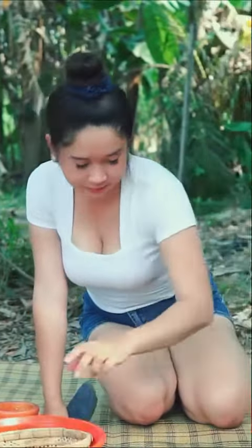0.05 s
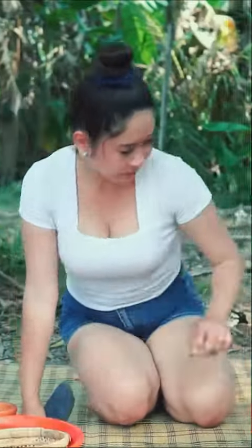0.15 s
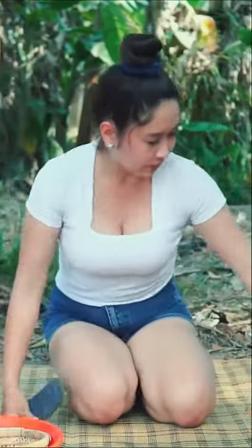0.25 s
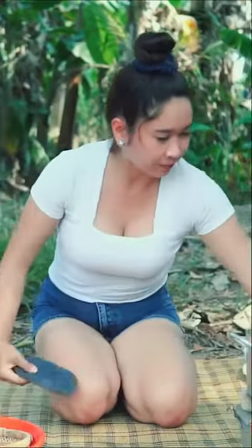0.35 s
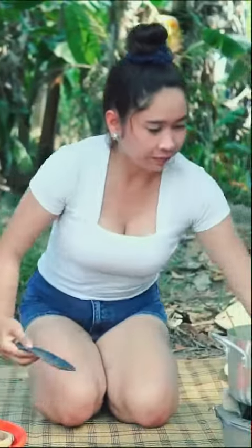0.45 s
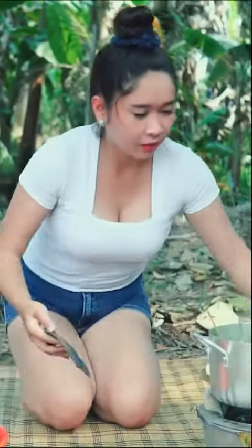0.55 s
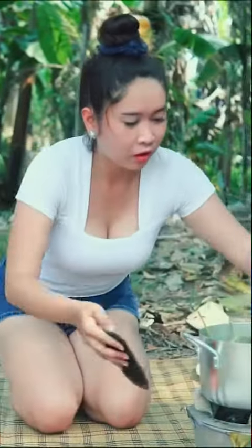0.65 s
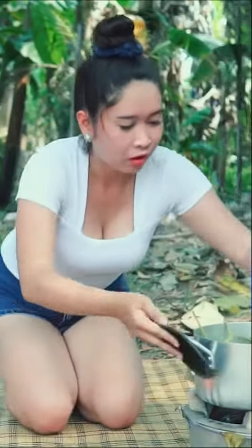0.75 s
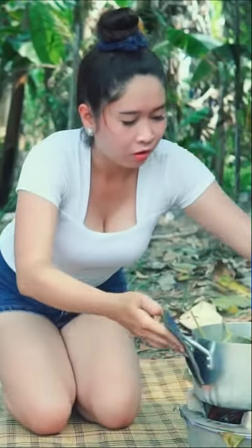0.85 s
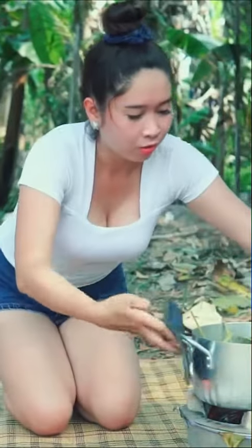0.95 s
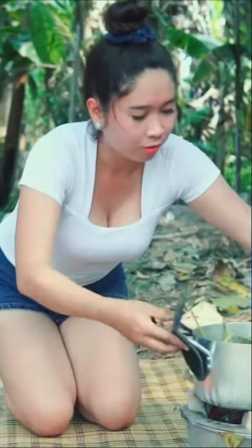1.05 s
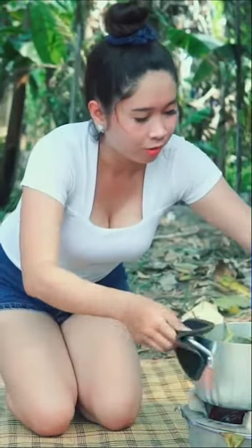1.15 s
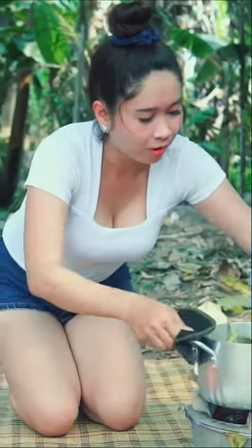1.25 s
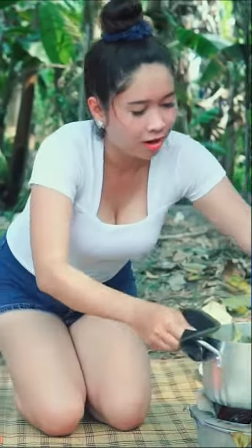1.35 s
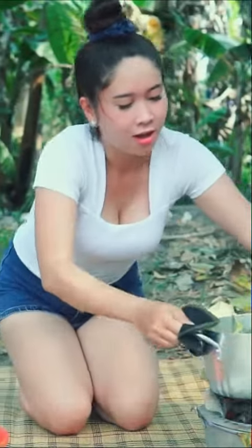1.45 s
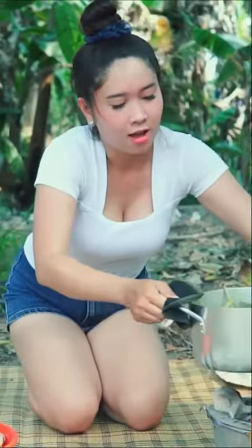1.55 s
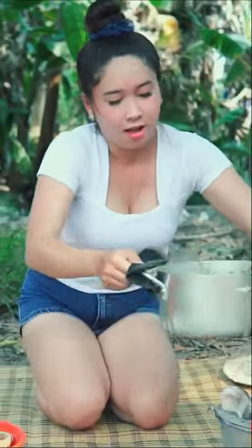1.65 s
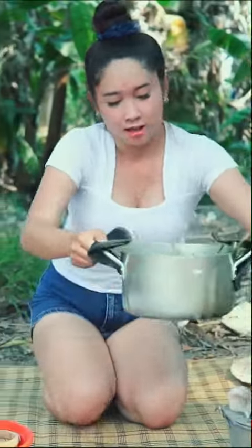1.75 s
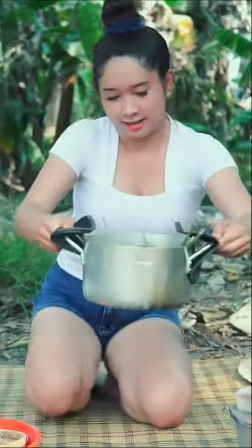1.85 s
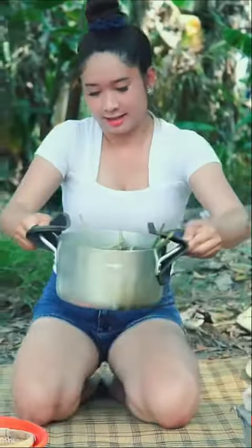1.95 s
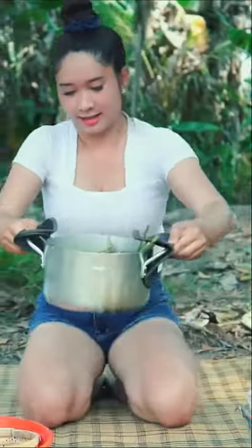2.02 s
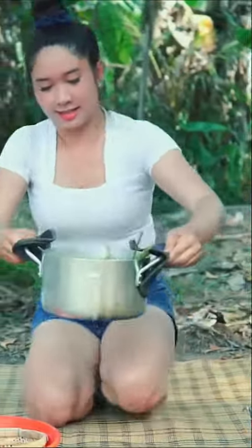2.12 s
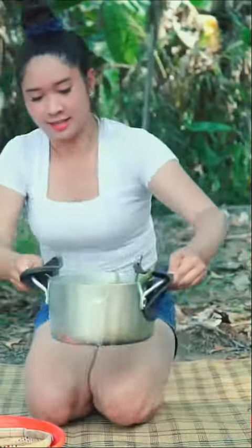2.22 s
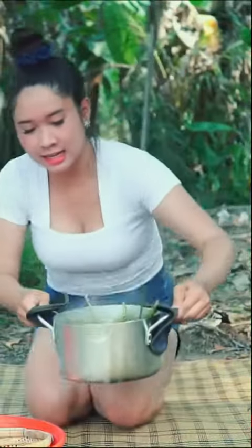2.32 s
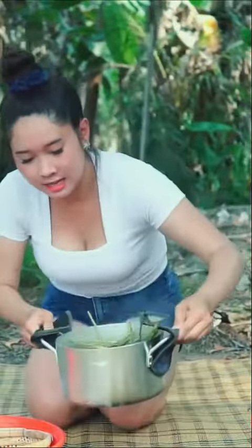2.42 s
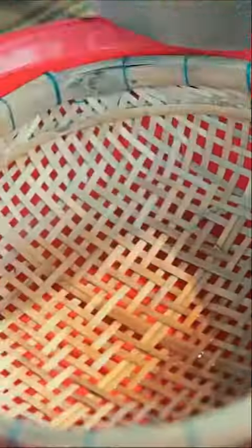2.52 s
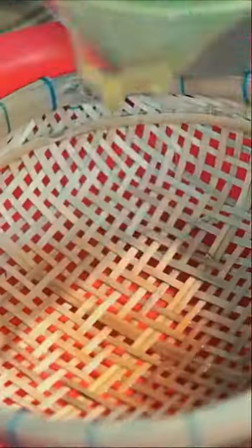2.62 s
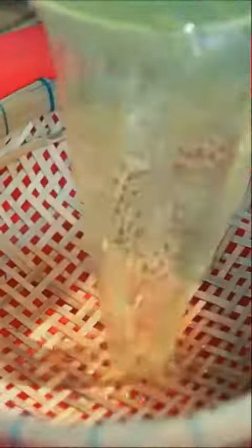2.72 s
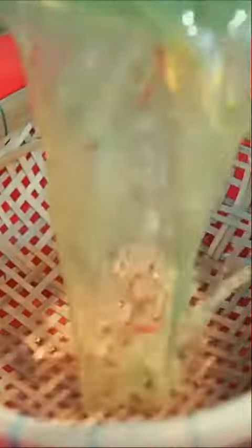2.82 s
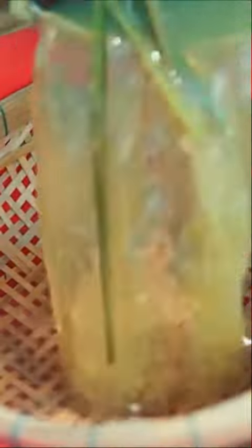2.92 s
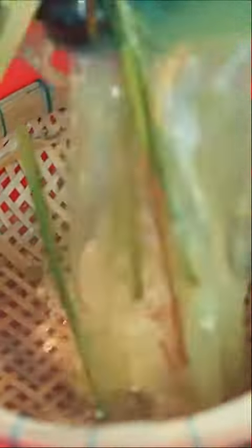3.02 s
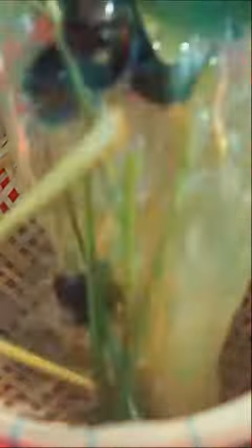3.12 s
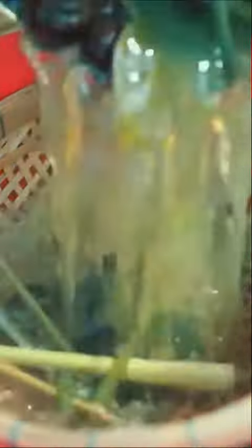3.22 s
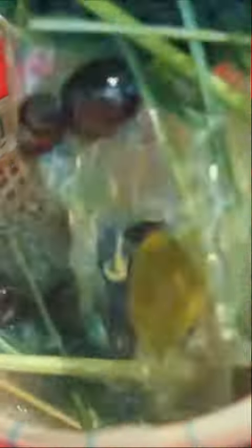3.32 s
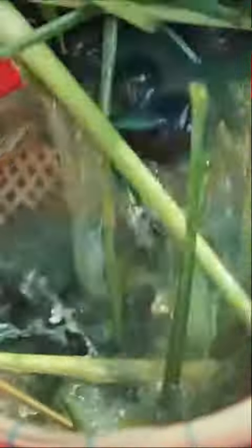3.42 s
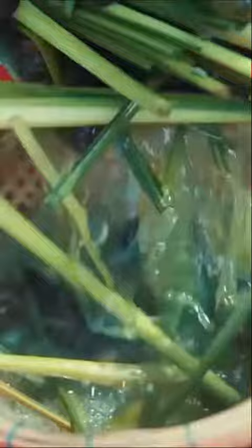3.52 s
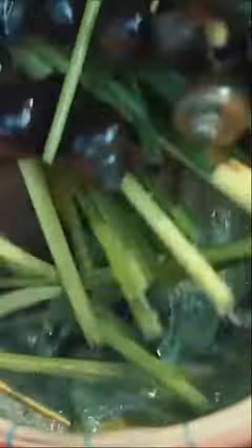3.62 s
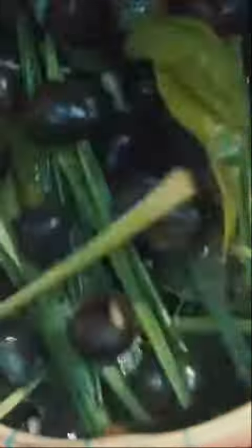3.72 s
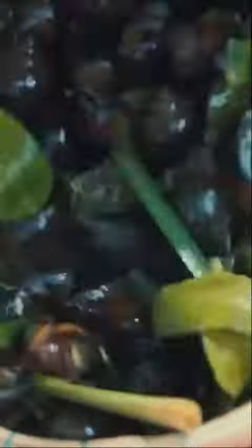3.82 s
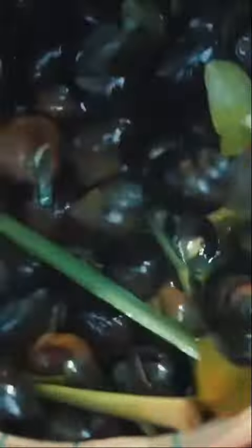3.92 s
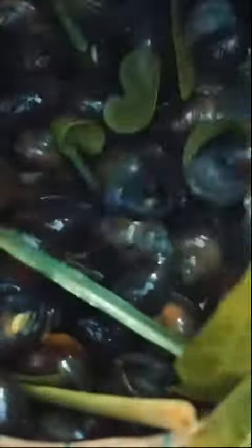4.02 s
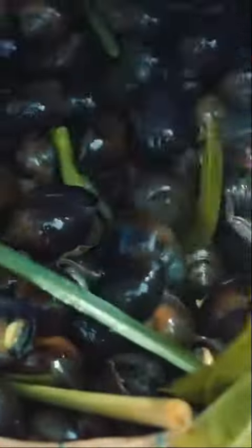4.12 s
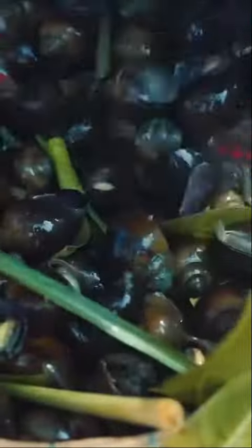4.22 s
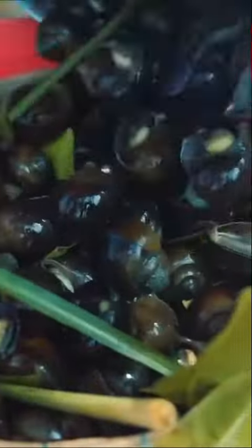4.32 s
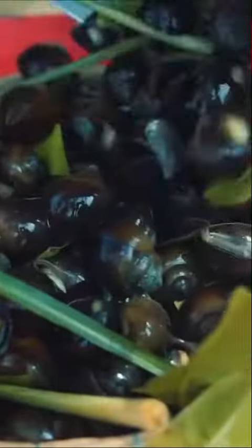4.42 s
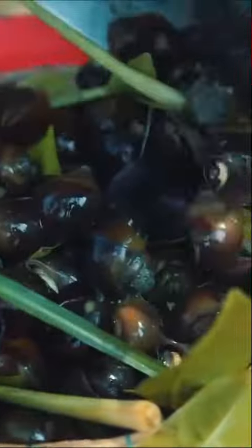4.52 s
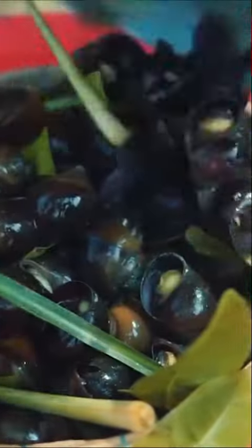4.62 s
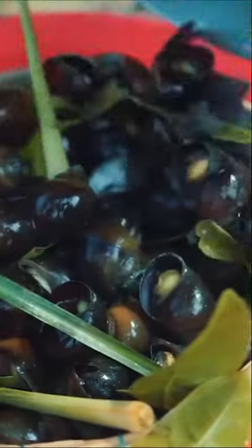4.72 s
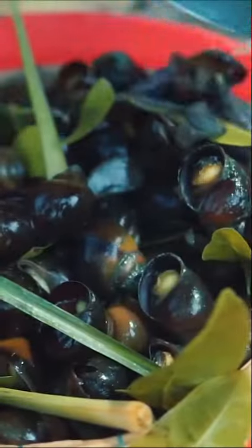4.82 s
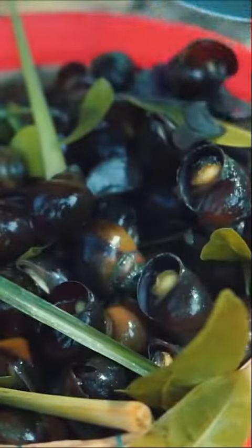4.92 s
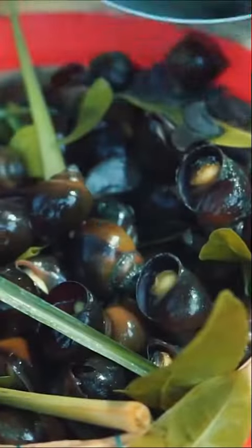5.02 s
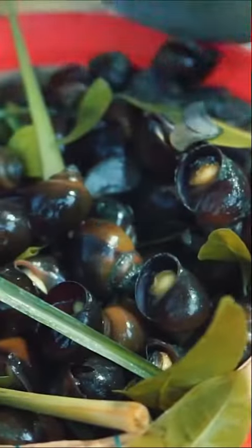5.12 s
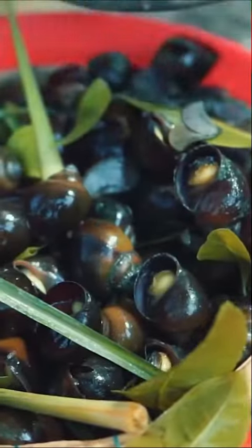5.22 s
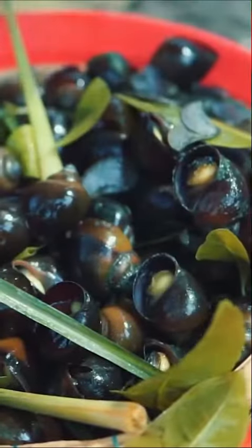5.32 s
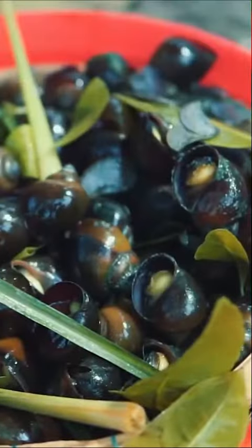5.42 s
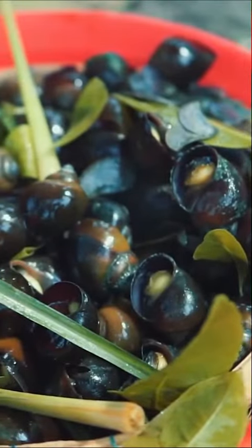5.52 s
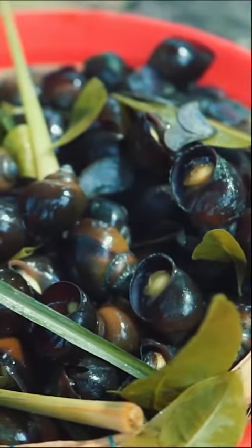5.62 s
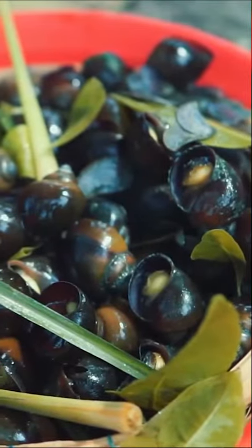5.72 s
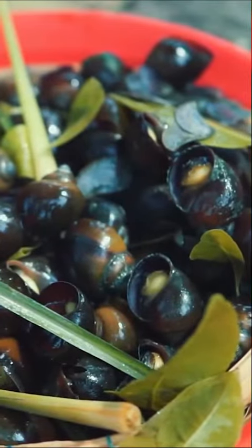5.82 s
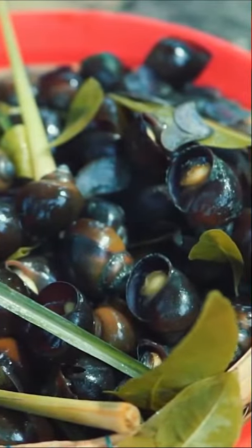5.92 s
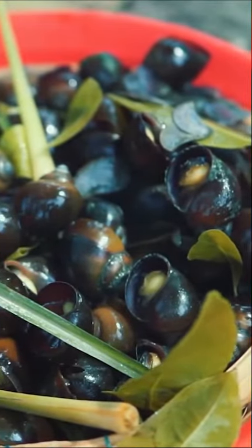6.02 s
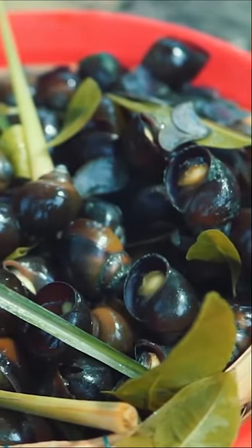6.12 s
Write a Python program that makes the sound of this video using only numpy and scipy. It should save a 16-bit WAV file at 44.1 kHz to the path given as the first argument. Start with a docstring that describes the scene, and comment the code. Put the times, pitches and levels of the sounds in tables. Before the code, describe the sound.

Boiled snails and broth tip from a pot into a woven basket, hard shells clattering wetly, then the empty pot clanks down among faint birdsong.

```python
"""A garden with trees: a pot of boiled snails is tipped into a woven basket close by.
Soft bumps lift the pot; broth splutters through the weave as filtered noise, and shells follow as chance
contacts, short pitched rings, steady narrow resonances, clacks and crunching clumps. The empty pot is set
down as a bank of struck modes. Small birds peep and whistle as gliding tones over noisy garden air.
"""
import sys
import numpy as np
from scipy import signal
from scipy.io import wavfile

SR = 44100
rng = np.random.default_rng(int(sys.argv[2]) if len(sys.argv) > 2 else 0)


def store_pcm(level_fs):
    """Save levels as 16-bit WAV."""
    pcm = np.round(np.clip(level_fs, -1, 1) * 32767).astype(np.int16)
    wavfile.write(sys.argv[1], SR, np.atleast_2d(pcm).T)


N = 271656
TIME = np.arange(N) / SR
SIDES = np.array([[1], [-1]])   # left, right

# band-pass filters across the audible range: (centre [Hz], width [Hz], filter)
EDGES = np.geomspace(22, 17000, 27)
BANK = [(np.sqrt(low * high), high - low, signal.butter(2, [low, high], "band", fs=SR, output="sos"))
        for low, high in zip(EDGES, EDGES[1:])]


def from_db(db):
    """Amplitude for a level in dB."""
    return 10 ** (np.asarray(db) / 20)


def rms_one(x):
    """Scale to an rms of 1."""
    return x / np.sqrt(np.mean(x ** 2) + 1e-20)


def at_hz(points, hz):
    """Read a table at one frequency, on a logarithmic axis."""
    table = np.array(points)
    return np.interp(np.log(hz), np.log(table[:, 0]), table[:, 1])


def in_time(rows):
    """Level curves in dB, at -120 dB outside their span."""
    s, *columns = np.transpose(rows)
    return [np.interp(TIME, s, c, left=-120, right=-120) for c in columns]


def filt(x, hz, kind, order=2):
    """Butterworth filter."""
    return signal.sosfilt(signal.butter(order, hz, kind, fs=SR, output="sos"), x + 1e-18)


def pan(db):
    """Left and right gains for a level difference."""
    gains = from_db(db * SIDES / 2)
    return gains / gains.mean()


def stereo(pair, alike):
    """Two unrelated signals become a left and right of the given likeness."""
    alike = np.clip(alike, -.99, .99)
    return np.sqrt(1 + alike) * pair[0] + np.sqrt(1 - alike) * pair[1] * SIDES


def add(out, s, sound):
    """Mix a sound in from time s."""
    start = int(np.clip(round(s * SR), 0, N - 1))
    out[..., start:start + sound.shape[-1]] += sound[..., :N - start]


def drift(rate, size=N):
    """A random wander through normal values, rate of them per second, joined by straight lines."""
    return np.interp(TIME[:size] * rate, np.arange(4096), rng.standard_normal(4096))


def swell(s, attack_s, hold_s, release_s):
    """An envelope that grows until time s, holds and dies away."""
    growth = np.minimum(TIME - s, 0) / attack_s
    decay = np.maximum(TIME - s - hold_s, 0) / release_s
    return np.exp(growth - decay)


def resonance(x, hz, width_hz):
    """A two-pole resonance with gain 1 on top."""
    r = np.exp(-np.pi * width_hz / SR)
    feed = np.array([1, 0, -1]) * (1 - r * r) / 2
    return signal.lfilter(feed, [1, -2 * r * np.cos(2 * np.pi * hz / SR), r * r], x + 1e-18)


def tone_at(hz_curve):
    """A sine that follows a pitch curve."""
    return np.sin(2 * np.pi * np.cumsum(hz_curve) / SR)


def echoes(x, t60, wet_db, size=26000):
    """Scattered reflections that die away, different on each side."""
    tail = rng.standard_normal((2, size)) * from_db(-60 * TIME[:size] / t60)
    tail /= np.sqrt(np.sum(tail ** 2, axis=1, keepdims=True))
    return x + from_db(wet_db) * signal.fftconvolve(np.atleast_2d(x), tail, axes=1)[:, :N]


# centres of body, clatter and splash [Hz]
ZONES_HZ = [1090, 3740, 10300]


def zone_level(zone_db, hz):
    """Level at one frequency, between those of body, clatter and splash."""
    shares = [np.interp(np.log(hz), np.log(ZONES_HZ), row) for row in np.eye(3)]
    return np.dot(shares, zone_db)


# flow out of the pot: (time [s], level [dB])
POUR_FLOW = [(2.6, -65), (2.741, -59.5), (2.82, -55), (3.01, -45), (3.14, -41), (3.33, -41.5), (3.46, -37),
             (3.599, -36.5), (3.68, -34), (3.77, -31.5), (3.86, -28), (4.0, -31), (4.11, -31.5),
             (4.15, -33), (4.225, -35.5), (4.27, -31.5), (4.298, -42), (4.335, -30), (4.45, -30.5),
             (4.56, -40), (4.595, -46), (4.68, -47), (4.77, -51), (5.05, -82)]
POUR_START_S, POUR_END_S = POUR_FLOW[0][0], POUR_FLOW[-1][0]
# the growing heap muffles the basket, and shell meets shell
HALF_FULL_S, HEAP_DAMPS_DB_PER_S, HEAP_BRIGHTENS_DB_PER_S = 3.67, 5, 6


def pour_levels(body_swing=0.97):
    """Body, clatter and splash in dB: all follow the flow, and the heap shifts the colour upward."""
    flow, heap = in_time(POUR_FLOW)[0], TIME - HALF_FULL_S
    body = flow.max() + body_swing * (flow - flow.max())
    return np.array([body - HEAP_DAMPS_DB_PER_S * heap, flow, flow + HEAP_BRIGHTENS_DB_PER_S * heap])


# colour of the shells: (frequency [Hz], density [dB per Hz])
SHELL_COLOUR = [(150, -15), (300, -17.5), (480, -10.5), (700, -9.5), (880, -10.5), (1280, 1), (1900, -1.5),
                (2400, 0), (3900, 1), (6100, -2), (6900, -5.5), (10400, -2.5), (14000, -10), (16000, -13.5)]
# likeness of the two sides, close by: (frequency [Hz], left-right likeness [-1 to 1])
NEAR_LIKENESS = [(300, 0.89), (1200, -0.2), (2400, 0.66), (5000, 0.5), (8000, 0.19), (13000, 0.2)]
# lean to the left, close by: (frequency [Hz], left-right difference [dB])
NEAR_PAN = [(400, 1), (1300, 3), (2400, 0.5), (4400, 5), (8100, 8.5), (15000, 11)]


def shell_sound(contacts, zone_db, patchy_db, lowest_hz=200):
    """Contacts excite every band with chance strengths; the colour shifts as the shells turn."""
    out, power, size = 0, 0, len(contacts)
    for hz, width, sos in BANK:
        if hz > lowest_hz:
            kicks = stereo(contacts * rng.standard_normal((2, size)), at_hz(NEAR_LIKENESS, hz))
            gain = from_db(at_hz(SHELL_COLOUR, hz))
            level = from_db(zone_level(zone_db, hz) + patchy_db * drift(59.6, size))
            band = signal.sosfilt(sos, kicks + 1e-18)
            out = out + gain * level * pan(at_hz(NEAR_PAN, hz)) * band
            power += gain ** 2 * width / (SR / 2)
    return out / np.sqrt(power)


def pour(contacts_per_s=800, size_db=2.0, wash=1.0, clatter_db=-0.5, splash_db=-0.5):
    """Countless small wet contacts over the wash of the broth."""
    during = (TIME > POUR_START_S) & (TIME < POUR_END_S)
    body, clatter, splash = pour_levels()[:, during]
    sizes = from_db(size_db * np.minimum(rng.exponential(1, N), 3.5))
    hits = rms_one(sizes * (rng.random(N) < contacts_per_s / SR))
    contacts = rms_one(hits + wash)
    out = np.zeros((2, N))
    zones = [body, clatter + clatter_db, splash + splash_db]
    add(out, POUR_START_S, shell_sound(contacts[during], zones, patchy_db=3.0))
    return out


def ring_growth(s, rise_db_per_s=10.0):
    """Level of the ringing in dB, growing until HALF_FULL_S, then constant."""
    return rise_db_per_s * np.minimum(s - HALF_FULL_S, 0)


def hollow_shells(t60=0.097, size_db=2.5, body_db=1.0, clatter_db=-1.5, splash_db=3.5,
                  lowest_hz=620, highest_hz=14000, count=750, size=4000):
    """Jostled shells and the bubbles between them ring briefly, each at its own pitch and place."""
    levels = pour_levels().T + [body_db, clatter_db, splash_db]
    out, t = np.zeros((2, N)), TIME[:size]
    chances = zip(rng.random((count, 2)), rng.standard_normal((count, 3)))
    for (when, pitch), (strength, place, skew) in chances:
        s = POUR_START_S + when * (POUR_END_S - POUR_START_S)
        hz = lowest_hz * (highest_hz / lowest_hz) ** (pitch ** .75)
        db = zone_level(levels[int(s * SR)], hz) + at_hz(SHELL_COLOUR, hz)
        db += size_db * min(strength, 1.5) + ring_growth(s)
        # high rings die sooner; each takes about a millisecond to start
        fade = from_db(-60 * t / t60 * (hz / 3000) ** .55) * (1 - np.exp(-t / .0008))
        ring = np.sin(2 * np.pi * hz * t + .5 * skew * SIDES)
        add(out, s, from_db(db) * fade * ring * pan(at_hz(NEAR_PAN, hz) + 4 * place))
    return out


def collision(force, hz, body_db, edge_db, ring_gain, ring_q, partner_gain=1.7, partner_octaves=0.895):
    """A burst of contacts rings the struck shell's cavity and its partner's; its power follows the force."""
    burst = shell_sound(force, [body_db, 0, edge_db], patchy_db=-4.5)
    partner_hz = hz * 2 ** (partner_octaves * rng.uniform(-0.923, 1))
    ring = ring_gain * resonance(burst, hz, hz / ring_q)
    partner = partner_gain * resonance(burst, partner_hz, partner_hz / (2 * ring_q))
    burst = burst + ring + partner
    return burst * np.sqrt(np.sum(force ** 2) / np.sum(burst.mean(axis=0) ** 2))


# later hits have less body; larger, lower shells have more
HIT_DAMPS_DB_PER_S, BODY_DB_PER_OCTAVE, TYPICAL_SHELL_HZ = 10.5, 10, 3420


def heap_body(s, hz):
    """Body in dB of a shell of a given pitch landing on the heap."""
    return -HIT_DAMPS_DB_PER_S * (s - HALF_FULL_S) - BODY_DB_PER_OCTAVE * np.log2(hz / TYPICAL_SHELL_HZ)


CRACK_LEAD_S = .005   # the graze heard before the impact


def crack(hz, edge_db, ring_gain=11.3, ring_q=5.4, partner_gain=3.6, snap_db=-2.0, size=2600):
    """The instant of impact: one click and a few cycles of the two shells' cavities."""
    click = np.zeros(size)
    click[round(CRACK_LEAD_S * SR)] = 1
    partner_hz = TYPICAL_SHELL_HZ * 2 ** rng.uniform(-1.46, 0.83)
    ring = ring_gain * resonance(click, hz, hz / ring_q)
    partner = partner_gain * resonance(click, partner_hz, partner_hz / ring_q)
    snap = from_db(edge_db + snap_db) * filt(click, 7400, "high")
    sound = filt(click, [1000, 5500], "band") + ring + partner + snap
    return filt(sound / np.abs(sound).max(), 410, "high")


# single shells colliding, levels relative: (time [s], crack level [dB], ring [Hz], rattle level [dB],
# treble against the rattle [dB], rattle decay [s])
CLACKS = [(2.645, -42, 1960, -35, -13, .0047), (3.0119, -17.5, 2000, -14, -38, 0.0021),
          (3.0261, -30, 1720, -22, -28, 0.0024), (3.1157, -6, 1750, -15.5, -11.5, 0.0038),
          (3.1536, -15, 2540, -23, -28, .0015), (3.2089, -4, 2060, -0.5, -22, 0.0018),
          (3.2574, -10, 2320, -11, -35, 0.0042), (3.2617, -13, 2280, -4.5, -11, 0.0021),
          (3.3384, -18, 4500, -16.5, -16, 0.0044), (3.3728, -1, 4740, -3.5, -21, 0.0038),
          (3.382, -11, 2330, -8.5, -12, 0.0065), (3.3965, -13, 1670, -10.5, -24, 0.0039),
          (3.504, -13, 4950, -19, -25, 0.0046), (3.5183, -7.5, 3670, -5, -14, 0.003),
          (3.5689, -8, 2820, -11, -32, .002), (3.6313, -11, 4470, -9, -26, 0.0033),
          (3.657, -5, 3700, -0.5, -13.5, 0.0016), (3.675, -15, 4950, -17, -26, .0023),
          (3.691, -9, 2600, -10, -27, .0018), (3.707, -2, 3300, -4, -24, 0.0028),
          (3.7298, -8, 3150, -10, -22, .002), (3.758, -3, 5060, -5.5, -16, 0.0034),
          (3.7676, -10.5, 1260, -11, -20, 0.0025), (3.7885, -10, 2480, -6, -23, 0.0025),
          (3.791, -7, 1800, -10, -21, .002), (3.8016, -19, 2440, -11, -16, 0.0038),
          (3.8169, -11, 4170, -2, -21, 0.0031), (3.8775, -14, 3700, -20, -10, .0015),
          (3.9278, -14, 4750, -9, -5, .0017), (3.948, -20, 3550, -18, -20, 0.0023),
          (3.991, -5, 6260, -4.5, -13, 0.004), (4.165, -13, 4400, -13, -16, .003),
          (4.1748, -14, 3930, -4, -21, 0.0027), (4.1882, -13, 2470, -13, -11, .0035),
          (4.2605, -11, 4160, -9.5, -24, .0029), (4.2837, -16, 1550, -16, -11, 0.0017),
          (4.312, -8.5, 2350, -4, -20, 0.003), (4.347, -12, 3900, -12, -4, .0015),
          (4.3742, -14, 3500, -15, -10, .002), (4.3973, -19, 5200, -10, -8, 0.003),
          (4.4337, -17, 4500, -6, -5, 0.0032), (4.492, -6, 4620, -5.5, -1, 0.0051),
          (4.572, -16, 1570, -16, -7, 0.0052), (4.6033, -16.5, 2970, -11.5, -8, 0.0023),
          (4.6506, -21, 2020, -18, -16, 0.0019), (4.6849, -12.5, 4900, -8, -10, 0.0024),
          (4.7326, -12.5, 3300, -5.5, -16, 0.0012), (4.7575, -24, 2800, -18.5, -11, .003),
          (4.7713, -27, 3900, -24, -10, .0025), (4.7963, -26, 5500, -20.5, -8, 0.0043),
          (4.8105, -25, 1500, -23.5, -9.5, 0.0044), (4.849, -22, 2480, -17, -17, 0.0037),
          (4.8784, -26, 3500, -19.5, -17, .0015), (4.9178, -16, 6600, -13.5, -6, 0.0035),
          (5.1335, -19, 5470, -22.5, -4.5, 0.0097)]


def clacks(crack_db=-0.5, rattle_db=-7.5, body_db=-2.0, edge_db=16.5,
           settle_db=-25.0, settle_s=0.032, graze_share=0.77, size=2600):
    """Two shells graze, meet in a sharp crack and rattle; then their neighbours settle."""
    out, t = np.zeros((2, N)), TIME[:size] - CRACK_LEAD_S
    after = np.maximum(t, 0)
    settling = from_db(settle_db) * np.exp(-after / settle_s)
    for s, crack_level, hz, rattle_level, treble, rattle_s in CLACKS:
        graze = np.exp(np.minimum(t, 0) / (graze_share * rattle_s))
        force = .5 * (np.exp(-after / rattle_s) + settling) * graze
        edge = treble + edge_db
        rattle = collision(force, hz, heap_body(s, hz) + body_db, edge, ring_gain=1.3, ring_q=8.9)
        impact = crack(hz, edge) * pan(at_hz(NEAR_PAN, hz) + 1.9)
        clack = from_db(rattle_level + rattle_db) * rattle + from_db(crack_level + crack_db) * impact
        add(out, s - CRACK_LEAD_S, clack)
    return out


# clumps of shells landing, levels relative:
# (time [s], level [dB], ring [Hz], spread [s], body [dB], treble [dB])
CLUMPS = [(3.138, -15, 2060, 0.011, 6.5, -8.5), (3.163, -12, 1890, 0.0022, 12, -13),
          (3.27, -8, 3530, 0.0047, 11, 5), (3.298, -14.5, 1530, 0.0064, 19, -1),
          (3.452, -8.5, 1170, 0.0094, 1, -9), (3.56, -8.5, 1394, 0.005, 9.5, -5.5),
          (3.641, -9.5, 3380, 0.0063, 7.5, -5.5), (3.693, -9, 3450, 0.0029, 15.5, -2),
          (3.717, -6, 3200, 0.0063, 6, 6), (3.791, -4.5, 2500, 0.0048, 3, -3),
          (3.864, -5.5, 3700, 0.025, -28, 4.5), (3.946, -7, 3560, 0.022, 5.5, 4),
          (4.012, -8.5, 5200, 0.029, 2.5, 7.5), (4.195, -11.5, 2130, 0.013, 1, -8),
          (4.25, -9.5, 7500, 0.003, -5, 1), (4.351, -13.5, 4550, 0.012, 1, 1.5),
          (4.491, -9.5, 4496, 0.0055, 1, 5), (4.628, -18, 1820, 0.006, 4.5, 0),
          (4.649, -21.5, 2170, 0.0092, 2, 0)]


def clumps(level_db=-14.0, edge_db=5.5, contact_share=.08, lag_s=0.00026, size=3528):
    """Several shells land almost together in a crunch that swells and fades."""
    out, t = np.zeros((2, N)), TIME[:size] - TIME[size] / 2
    for s, db, hz, spread, body, treble in CLUMPS:
        grains = rms_one(1.0 * (rng.random(size) < contact_share))
        force = grains / np.cosh((t - lag_s) / spread)
        crunch = collision(force, hz, body, treble + edge_db, ring_gain=1.32, ring_q=8.2)
        add(out, s + t[0], from_db(db + level_db) * crunch)
    return out


# steady narrow resonances heard over the pour and clumps: (frequency [Hz], relative gain [dB])
STEADY_TONES = [(610, 5.5), (708, 3.5), (1300, -8), (2220, 1), (2484, -2), (2684, 0), (3530, 5.5),
                (3838, 0), (3990, -2), (4500, 7), (5156, 2.5), (5490, -2.5), (5940, 4), (6335, 4)]


def steady_tones(x, direct_db=-1.5, ring_db=-1.0, width_hz=28, wander_db=3.5, wander_per_s=7):
    """Steady narrow resonances over the pour and clumps; each wanders in level."""
    rings = 0
    for hz, db in STEADY_TONES:
        level = from_db(db + wander_db * drift(wander_per_s))
        rings = rings + level * resonance(x, hz, width_hz)
    return from_db(direct_db) * x + from_db(ring_db + ring_growth(TIME)) * rings


# broth drumming through the bare weave: (time [s], level [dB])
STREAM = [(2.74, -76), (2.79, -54), (2.9, -51.5), (3.0, -42), (3.1, -47.5), (3.25, -55.5)]


def stream(hz=2400, width_hz=560, spray_db=-0.5, splutter_db=0.5, splutter_per_s=130):
    """The first broth splutters through the weave with a hollow gurgle and a fine spray of drops."""
    hollow = resonance(resonance(rng.standard_normal((2, N)), hz, width_hz), hz, width_hz)
    gurgle = hollow * from_db(splutter_db * drift(splutter_per_s))
    gurgle = rms_one(stereo(gurgle, alike=0.95)) * pan(db=2.0)
    drops = rng.standard_normal((2, N)) * (rng.random(N) < 3000 / SR)   # 3000 drops per second
    spray = from_db(spray_db) * rms_one(filt(drops, [4000, 13000], "band", order=1)) * pan(db=12.0)
    return (gurgle + spray) * from_db(in_time(STREAM)[0])


# a shell squeaks along the rim of the pot: (time [s], level [dB], spread [s])
SQUEAKS = [(4.709, -26, 0.0039), (4.744, -32, 0.0058)]
# tones of the squeak: (frequency [Hz], relative level [dB])
SQUEAK_TONES = [(4290, -8), (4730, -3.5), (5500, -11)]


def squeaks(rough=0.0079):
    """A shell slides over the metal rim and squeals on a few unsteady tones."""
    level = sum(from_db(db) * np.exp(-np.hypot(1, (TIME - s) / spread) + 1) for s, db, spread in SQUEAKS)
    tones = sum(from_db(db) * tone_at(hz * (1 + rough * drift(790))) for hz, db in SQUEAK_TONES)
    return level * tones * pan(db=6.0)


def struck(modes, contact_hz, sharpness, skew, size=12000):
    """One blow excites the modes near contact_hz most; each reaches the two sides with its own phase."""
    t, out = TIME[:size], 0
    for k, (hz, db, t60) in enumerate(modes):
        mistuning = sharpness * (hz / contact_hz - contact_hz / hz)
        strength = from_db(db + rng.standard_normal()) / np.hypot(1, mistuning)
        phase = skew * rng.uniform(-1, 1) * SIDES
        ring = np.sin(2 * np.pi * hz * t + phase) * from_db(-60 * t / t60)
        out = out + strength * (-1) ** k * ring
    return out * (1 - np.exp(-t * contact_hz * 2 * np.pi))


# first lumps on the bare weave: (time [s], level [dB])
BASKET_KNOCKS = [(2.6855, -28.5), (2.943, -26.5), (3.209, -29), (3.277, -28.5), (3.563, -37.5)]
# modes of the basket: (frequency [Hz], relative level [dB], decay by 60 dB [s])
BASKET_MODES = [(264, -10, 0.045), (465, 1, 0.045), (805, -4, 0.028), (1820, -12, 0.044),
                (2380, -10, 0.039)]


def basket(tick_db=-8.0, tick_s=0.017):
    """The empty weave answers with a dull knock and a tick."""
    out = np.zeros((2, N))
    for s, db in BASKET_KNOCKS:
        knock = struck(BASKET_MODES, contact_hz=800, sharpness=.1, skew=0.59)
        tick = filt(rng.standard_normal(knock.shape), [900, 5000], "band", order=1)
        tick = tick * np.exp(-TIME[:knock.shape[1]] / tick_s)
        add(out, s, from_db(db) * (knock + from_db(tick_db) * tick))
    return out * pan(db=2.5)


# the pot set down and rocking: (time [s], level [dB], frequency the contact excites most [Hz])
POT_BLOWS = [(5.7665, -13, 590), (5.7757, -12.5, 820), (5.777, -18, 257), (5.781, -18.5, 1340),
             (5.792, -24, 1800), (5.801, -21.5, 270), (5.826, -20.5, 405), (5.851, -23, 320)]
# modes of the pot: (frequency [Hz], relative level [dB], decay by 60 dB [s])
POT_MODES = [(214, -1.5, 0.031), (274, 1, 0.077), (350, -3.5, 0.087), (462, 0, 0.063), (556, -7, 0.043),
             (699, -1, 0.095), (800, -8.5, .05), (930, -1, 0.029), (1290, -1.5, 0.087), (1426, -4, 0.078),
             (1620, -10, 0.063), (1804, -8, 0.11), (2050, -25, .09), (2880, -9, 0.057)]


def pot_down(grit_db=-9.0, grit_s=0.024, grit_top_hz=3500, sand_db=-32.5, sand_lag_s=0.0047):
    """The thin pot lands on gritty ground and rocks to rest, crushing sand under its rim."""
    out = np.zeros((2, N))
    for s, db, contact_hz in POT_BLOWS:
        ring = struck(POT_MODES, contact_hz, sharpness=2.8, skew=0.8)
        crunch = rng.standard_normal(ring.shape) * np.exp(-TIME[:ring.shape[1]] / grit_s)
        crunch = crunch * contact_hz / 1000   # harder contacts crush more grit
        add(out, s, from_db(db) * (ring + from_db(grit_db) * filt(crunch, grit_top_hz, "low", order=1)))
    crush = swell(POT_BLOWS[0][0] + sand_lag_s, attack_s=0.0016, hold_s=0.016, release_s=0.018)
    sand = rms_one(filt(rng.standard_normal((2, N)), [5000, 15000], "band", order=1))
    sand = sand * from_db(sand_db) * crush
    return filt(out, 190, "high") * pan(db=3.5) + sand * pan(db=10.0)


# bumps as the pot is gripped, lifted and let go: (time [s], relative level [dB], frequency [Hz])
BUMPS = [(.438, -25, 163), (0.519, -31.5, 130), (0.749, -31, 234), (0.76, -29, 179), (.77, -18, 165),
         (0.792, -25, 230), (0.804, -28, 110), (.871, -30, 250), (.89, -23, 191), (1.495, -29, 190),
         (5.868, -34, 100), (6.003, -35, 180)]


def bumps(swell_s=0.0013):
    """Damped, low bumps of the pot in padded hands."""
    out, t = np.zeros(N), TIME[:SR // 10]
    envelope = t / swell_s * np.exp(1 - t / swell_s)
    for s, db, hz in BUMPS:
        add(out, s - .001, -from_db(db) * np.sin(2 * np.pi * hz * t) * envelope)
    return filt(out, [55, 900], "band") * pan(db=3.5)


GRIP_S, GRIP_LENGTH_S, GRIP_FADE_DB_PER_S = 0.752, 0.18, 70


def grip(rub_db=-41.5, rub_top_hz=390, groan_db=5.0, groan_hz=185, groan_width_hz=50):
    """The pad shifts on the handle and settles: rubbing noise and an unsteady groan."""
    envelope = swell(GRIP_S, attack_s=0.015, hold_s=GRIP_LENGTH_S, release_s=0.027)
    fade = from_db(-GRIP_FADE_DB_PER_S * np.maximum(TIME - GRIP_S, 0))
    groan = from_db(groan_db) * tone_at(groan_hz + groan_width_hz * drift(150))
    rub = rms_one(filt(rng.standard_normal(N), [90, rub_top_hz], "band", order=3))
    return (rub + groan) * from_db(rub_db) * envelope * fade * pan(db=3.5)


SWISH_S, SWISH_SWELL_S = 5.455, 0.2


def swish(swish_db=-57.5, flick_db=-45.5):
    """High noise swells in a wet swish as the pot leaves, with a short flick."""
    half_s = SWISH_SWELL_S / 2
    sweep = from_db(swish_db) * swell(SWISH_S - half_s, attack_s=0.066, hold_s=half_s, release_s=0.088)
    flick = from_db(flick_db) * swell(SWISH_S, attack_s=0.015, hold_s=0, release_s=0.009)
    noise = rms_one(filt(rng.standard_normal((2, N)), [7500, 15000], "band"))
    return noise * (sweep + flick) * pan(db=13.0)


# the peeps: (start time [s], relative level [dB])
PEEPS = [(0.72, -43.5), (2.25, -43), (4.883, -39.5), (5.849, -39.5)]
# a peep steps down in three flicks: (time into the peep [s], pitch [Hz], relative level [dB])
PEEP_SHAPE = [(0, 4055, -22), (.011, 4650, -11), (.021, 5500, -20), (0.0277, 4480, -9), (.03, 3330, -10),
              (.036, 3970, -1), (0.041, 4255, 4.5), (.046, 3340, -3), (.06, 3174, -7), (.07, 3253, -13),
              (0.082, 3020, -1.5), (.088, 3420, 1), (.093, 2926, -3.5), (.108, 2880, -2.5),
              (.125, 2684, -9.5), (.135, 2520, -27)]


def peeps(level_db=-1.0, rough=0.056, rasp_db=-16.0, rasp_hz=4700, rasp_width_hz=1700):
    """One small bird repeats a slightly rough, falling peep with a rasp of resonant noise."""
    s, hz, note_db = np.transpose(PEEP_SHAPE)
    out, t = np.zeros(N), TIME[:int(s[-1] * SR)]
    slide, shape = np.interp(t, s, hz), from_db(np.interp(t, s, note_db))
    for start, db in PEEPS:
        tone = shape * tone_at(slide * (1 + rough * drift(1600, len(t))))
        rasp = resonance(rng.standard_normal(len(t)), rasp_hz, rasp_width_hz)
        rasp = rms_one(resonance(rasp, rasp_hz, rasp_width_hz)) * np.sin(np.pi * t / s[-1])
        add(out, start, from_db(db + level_db) * (tone + from_db(rasp_db) * rasp))
    return echoes(out, t60=0.33, wet_db=-1.0)


# farther birds, levels relative: (start time [s], length [s], pitch [Hz], level [dB],
# strongest overtone [Hz], fall away from it [dB per octave], final sag [share of pitch], hoarseness [dB])
WHISTLES = [(0.127, 0.12, 1060, -47, 3060, 50, 0.028, -18), (0.451, 0.11, 1084, -51, 2300, 20, 0.053, -12),
            (0.481, .21, 1110, -50.5, 3300, 51, .01, -12), (0.549, 0.14, 1146, -52, 2250, 25, 0.0022, -14),
            (0.642, 0.031, 1338, -50, 2600, 40, 0.18, -10),
            (0.654, 0.074, 1130, -43.5, 2230, 23, 0.015, -15), (0.951, 0.21, 950, -53.5, 2900, 29, 0, -9),
            (1.059, 0.062, 1206, -55.5, 2380, 40, .03, -15), (1.695, 0.19, 1166, -52, 4340, 16, .08, -1),
            (1.762, 0.06, 1195, -46, 2300, 28, 0.14, -25), (1.822, 0.039, 1246, -52, 2450, 20, 0.17, -9),
            (2.25, 0.09, 940, -56, 1800, 30, 0.026, -11)]


def whistles(scoop_share=0.13, scoop_part=.22, waver=0.023, odd_db=-6.0,
             hoarse_spread=0.09, flutter_db=3.5, count=7):
    """Reedy whistles scoop up and sag, heard by fluttering, partly hoarse overtones blurred by the trees."""
    out = np.zeros(N)
    for s, length, hz, db, strongest_hz, fall_db, sag_share, hoarse_db in WHISTLES:
        u = np.linspace(0, 1, int(length * SR))
        arch = hz * (1 - scoop_share * np.exp(-u / scoop_part) - sag_share * u ** 4)
        for part_db, jitter in ((0, waver), (hoarse_db, hoarse_spread)):
            phase = 2 * np.pi * np.cumsum(arch * (1 + jitter * drift(600, len(u)))) / SR
            tone = 0
            for k in range(2, 2 + count):   # overtones only, no fundamental
                overtone_db = odd_db * (k % 2) - fall_db * abs(np.log2(k * hz / strongest_hz))
                flutter = flutter_db * drift(92, len(u))
                tone = tone + from_db(overtone_db + flutter) * np.sin(k * phase)
            add(out, s, from_db(db + part_db) * np.sin(np.pi * u) * tone)
    return echoes(out, t60=0.55, wet_db=-2.5)


# colour of the garden air: (frequency [Hz], relative density [dB per Hz])
AIR = [(15, -41), (25, -8), (87, -3), (301, -8.5), (335, -9.5), (489, -12), (575, -13.5), (1190, -19.5),
       (1700, -23), (2300, -20.5), (2840, -18.5), (3080, -20.5), (3620, -22.5), (10700, -30), (12900, -27),
       (16000, -33.5)]
# likeness of the two sides in the open: (frequency [Hz], left-right likeness [-1 to 1])
AIR_LIKENESS = [(60, 1), (250, 0.73), (1000, 0.01), (4000, 0.22), (14000, 0.1)]


def garden_air(air_db=-50, patchy_db=1.97):
    """A low outdoor rumble with a hiss of leaves: noise bands whose levels wander a little."""
    out, white = 0, rng.standard_normal((2, 2, N))
    for k, (hz, width, sos) in enumerate(BANK):
        band = signal.sosfilt(sos, stereo(white[k % 2], at_hz(AIR_LIKENESS, hz)))
        out = out + band * from_db(at_hz(AIR, hz) + patchy_db * drift(9.0))
    return from_db(air_db) * rms_one(out) * pan(db=0.5)


def scene():
    """Shells and broth with the basket's short echoes, the pot, the birds and the garden air."""
    shells = stream() + steady_tones(pour() + clumps()) + hollow_shells() + clacks() + squeaks()
    in_basket = echoes(shells, t60=.05, wet_db=-13.0, size=4000)
    pot = pot_down() + bumps() + grip() + swish()
    return in_basket + basket() + pot + peeps() + whistles() + garden_air()


def record(dry, cutoff_hz=16000):
    """At the microphones the tallest peaks are rounded and the top is cut."""
    low_pass = signal.ellip(10, .1, 80, cutoff_hz, fs=SR, output="sos")
    return signal.sosfilt(low_pass, np.tanh(dry))


dry = scene()
out = record(dry)
store_pcm(out)
```